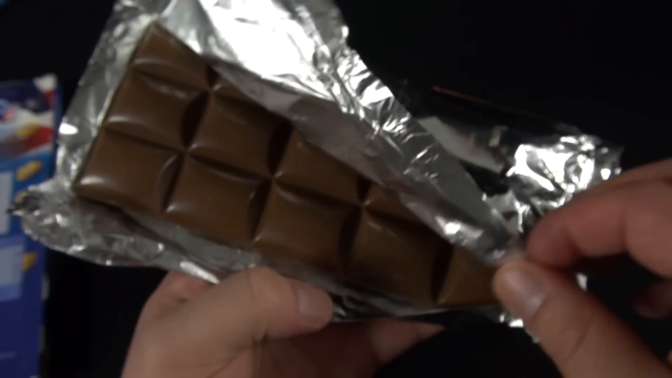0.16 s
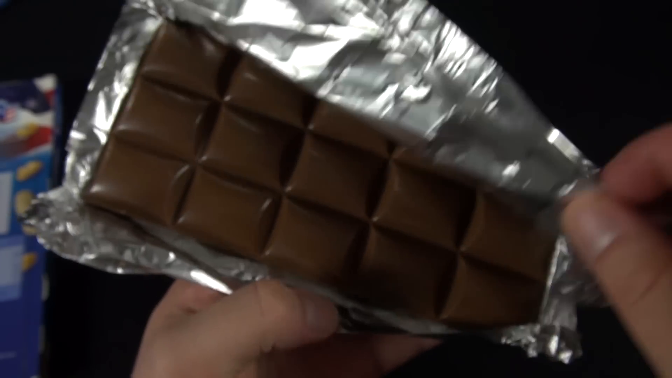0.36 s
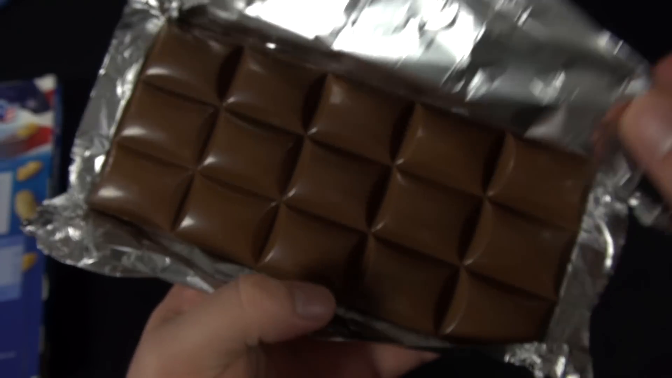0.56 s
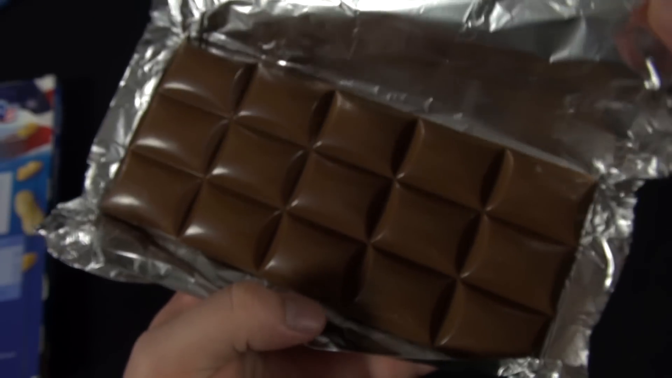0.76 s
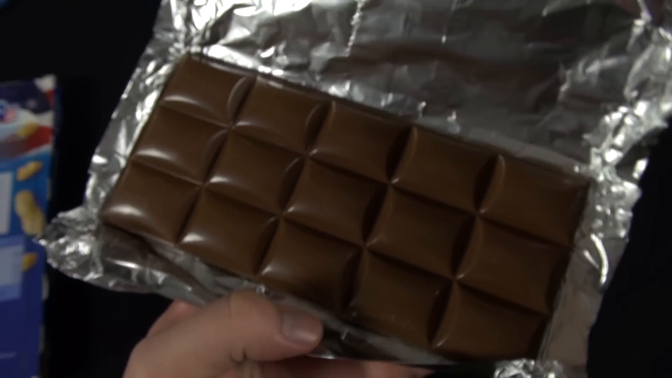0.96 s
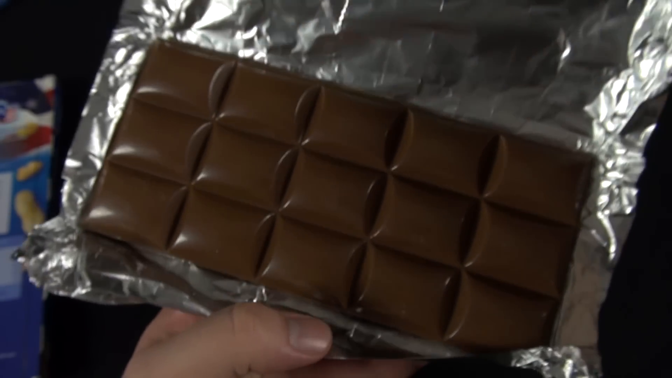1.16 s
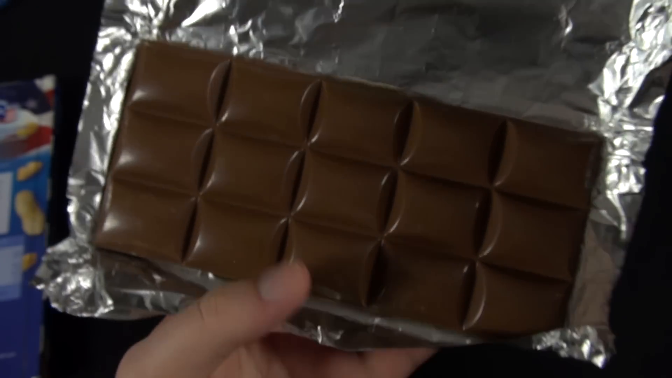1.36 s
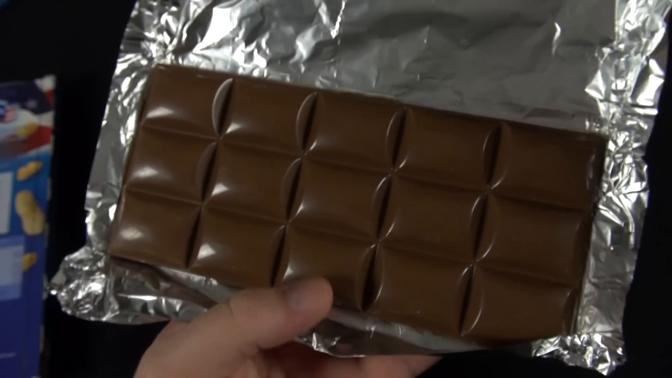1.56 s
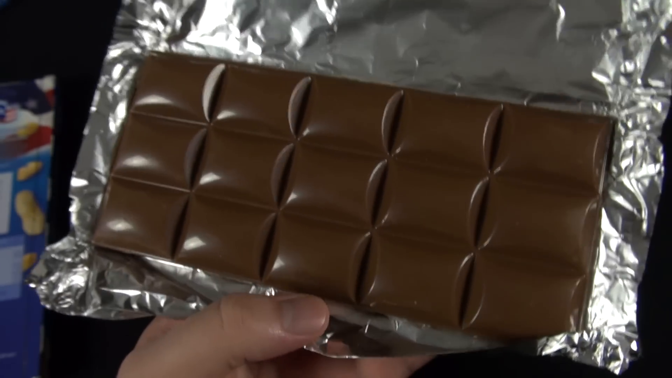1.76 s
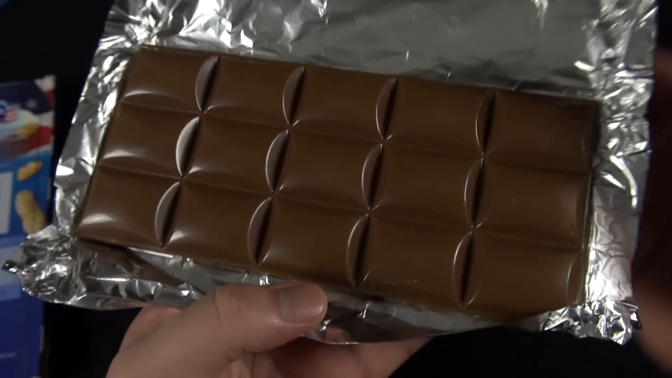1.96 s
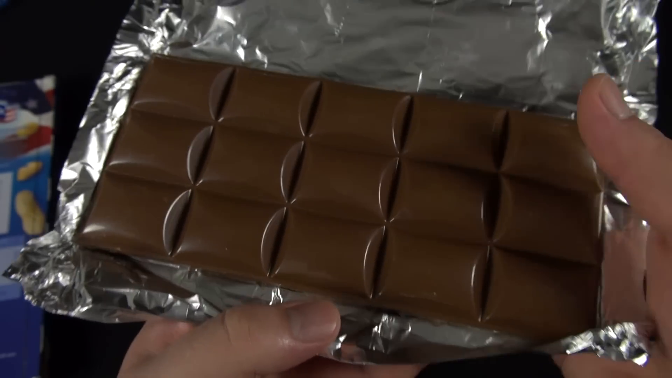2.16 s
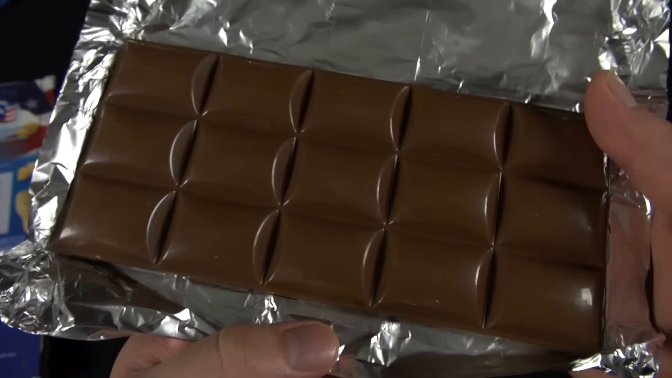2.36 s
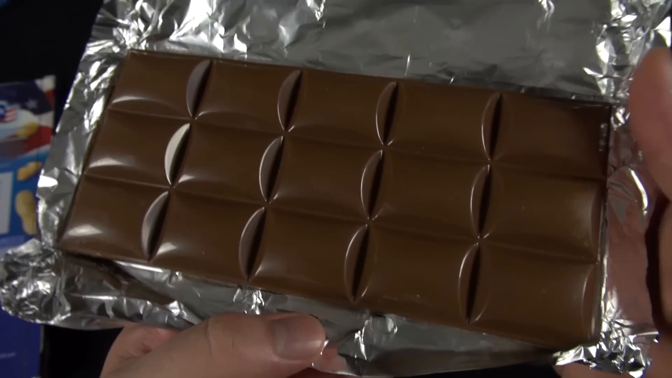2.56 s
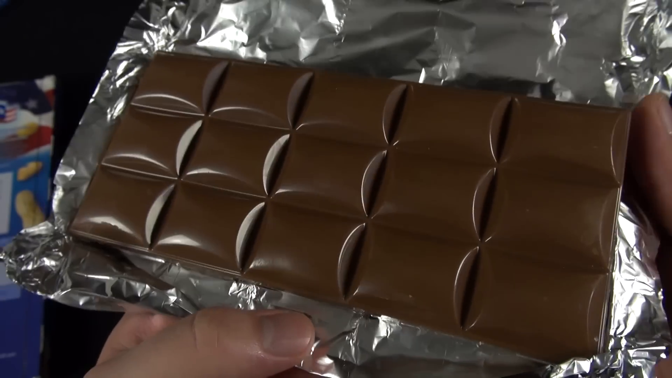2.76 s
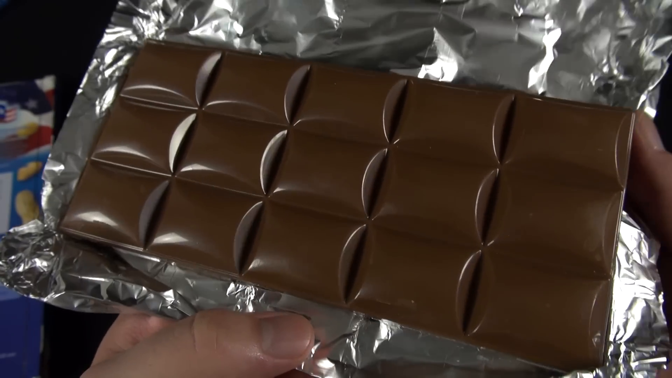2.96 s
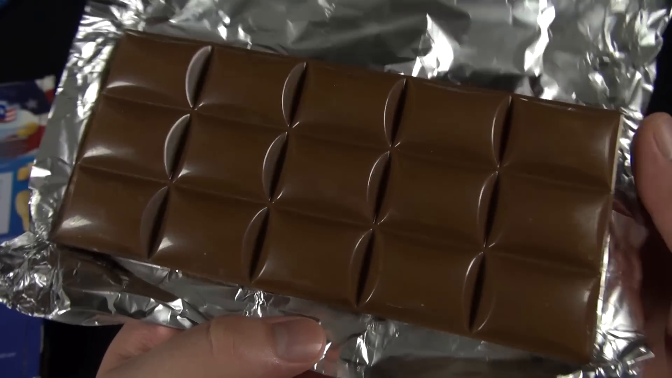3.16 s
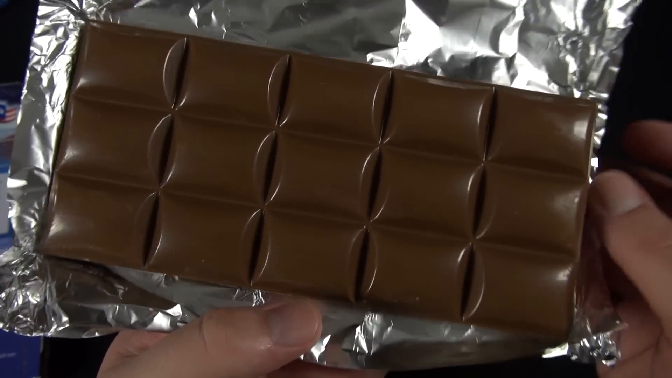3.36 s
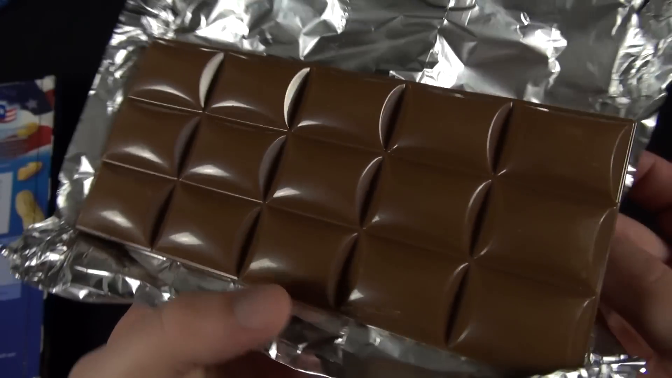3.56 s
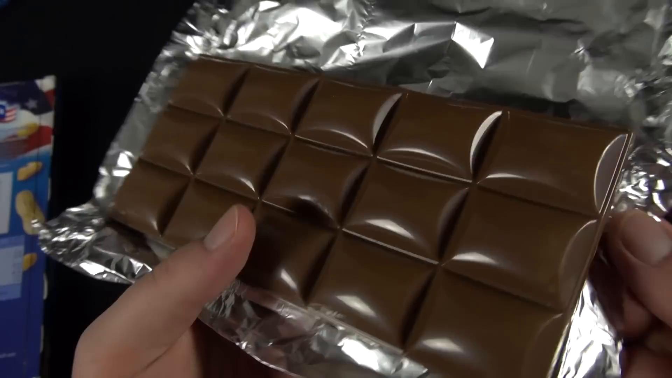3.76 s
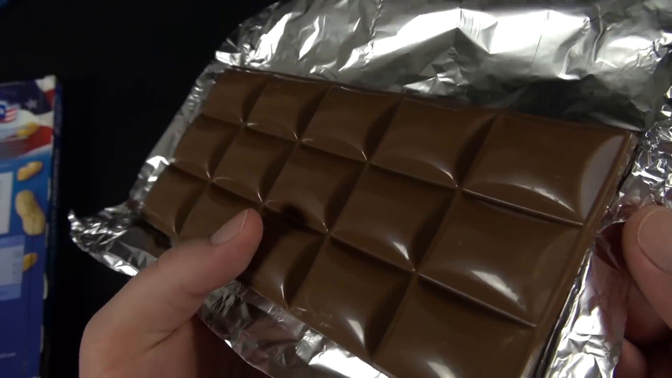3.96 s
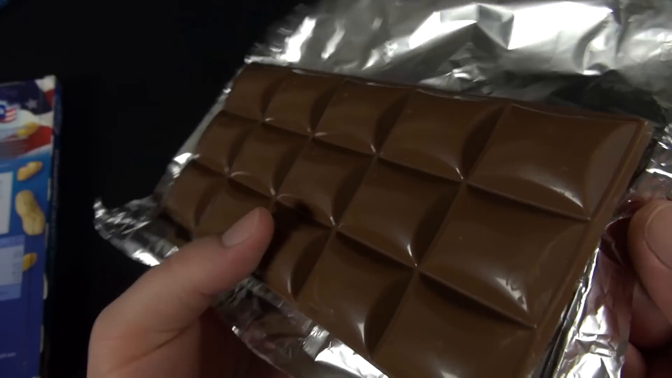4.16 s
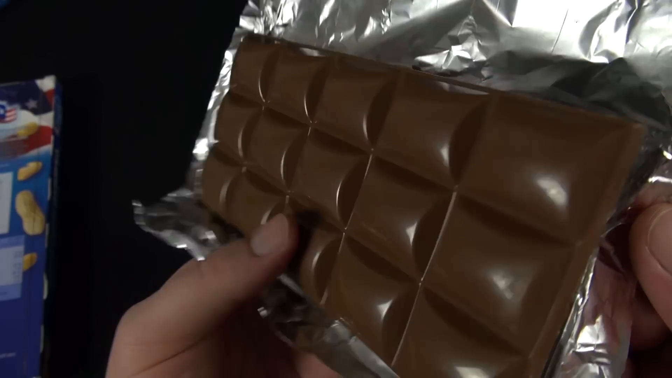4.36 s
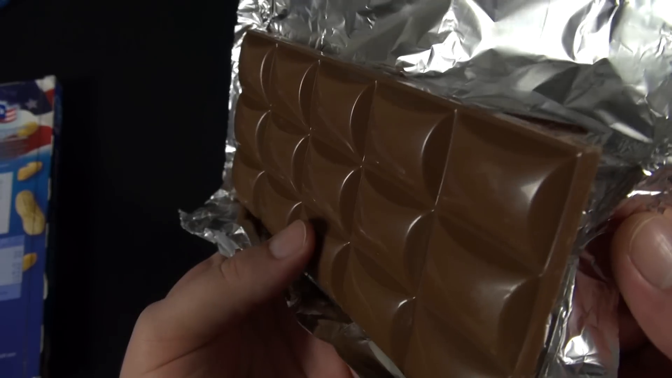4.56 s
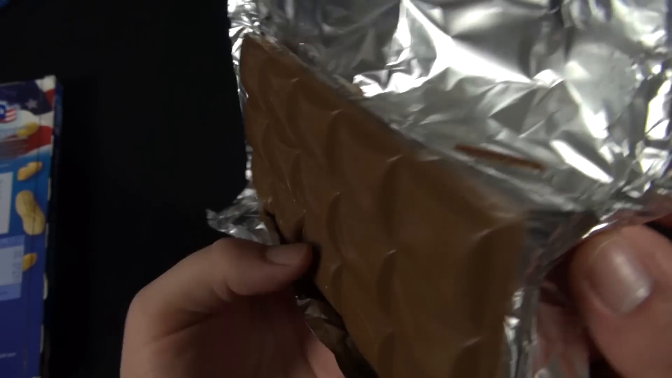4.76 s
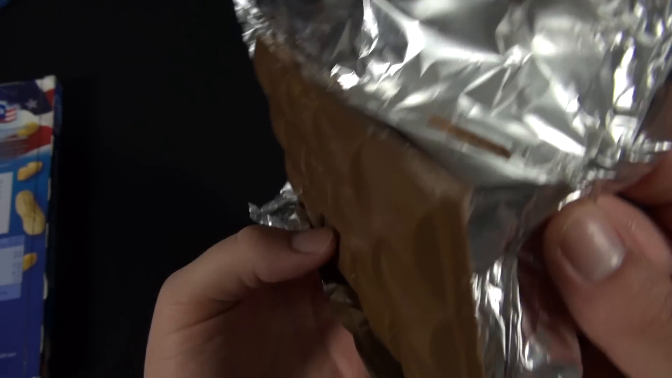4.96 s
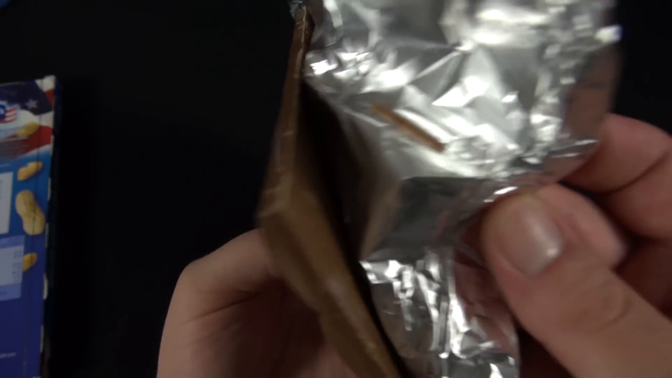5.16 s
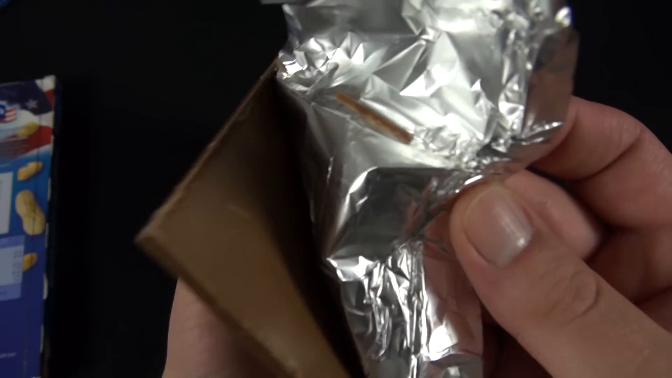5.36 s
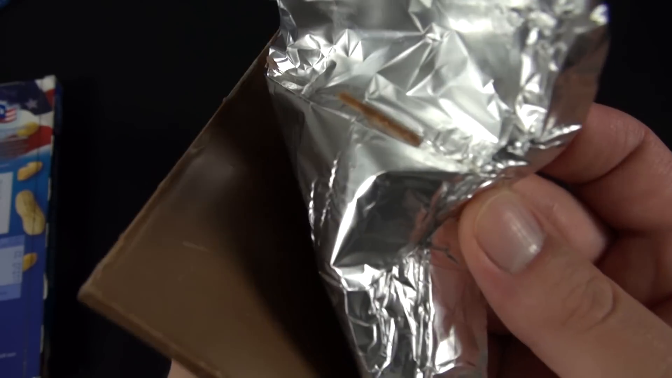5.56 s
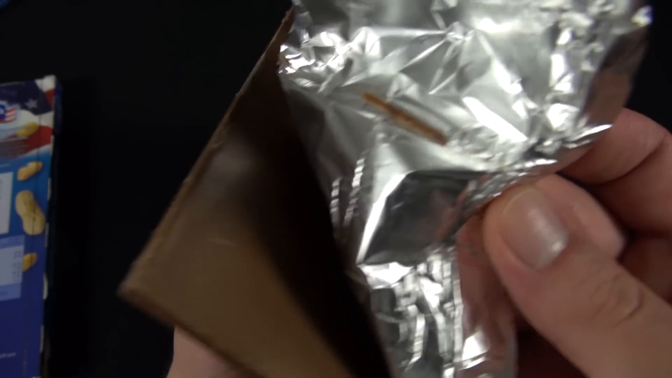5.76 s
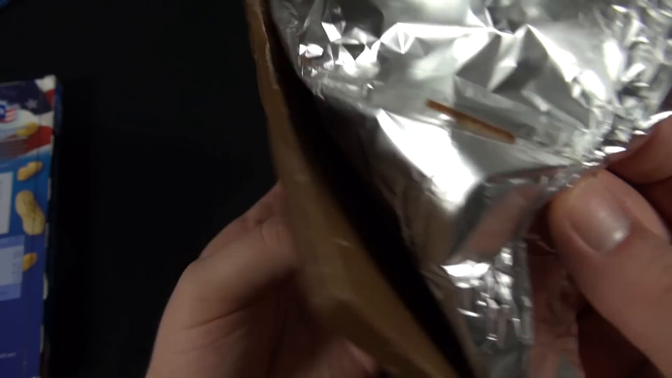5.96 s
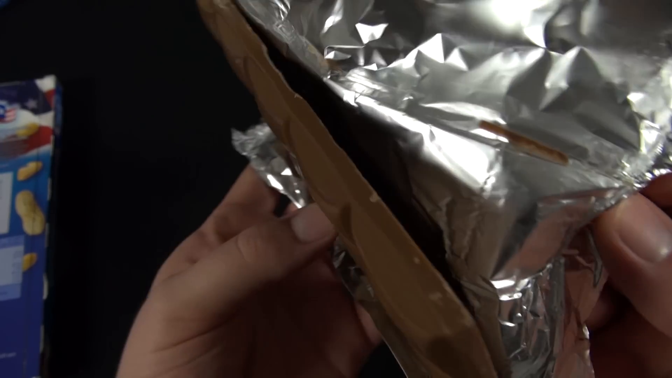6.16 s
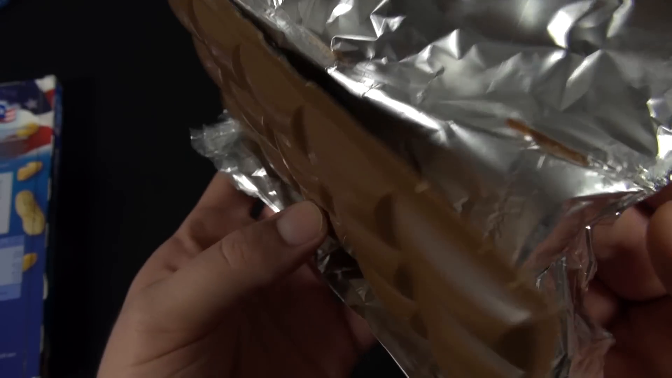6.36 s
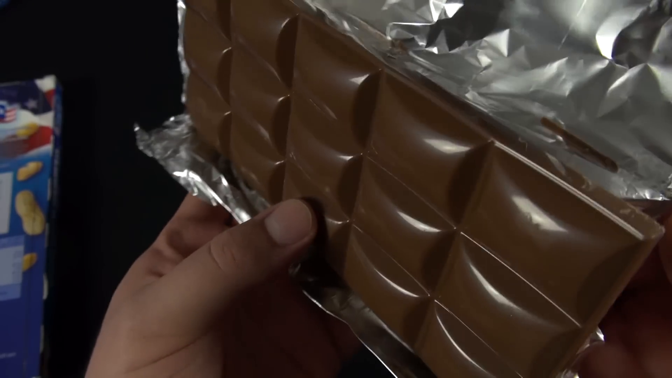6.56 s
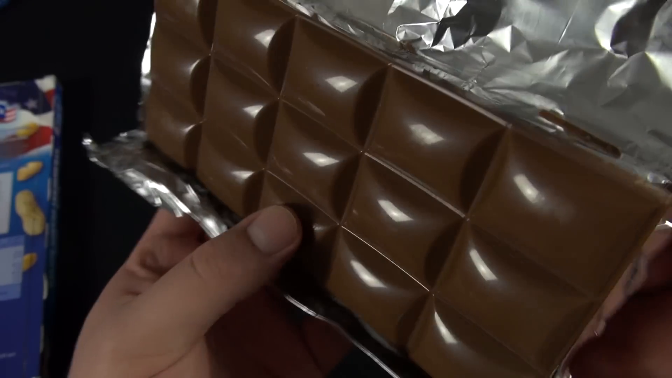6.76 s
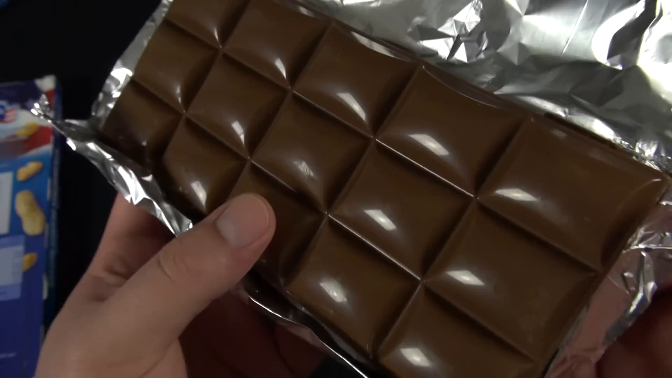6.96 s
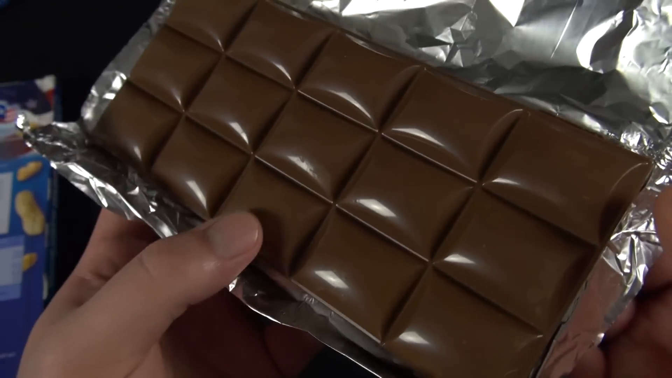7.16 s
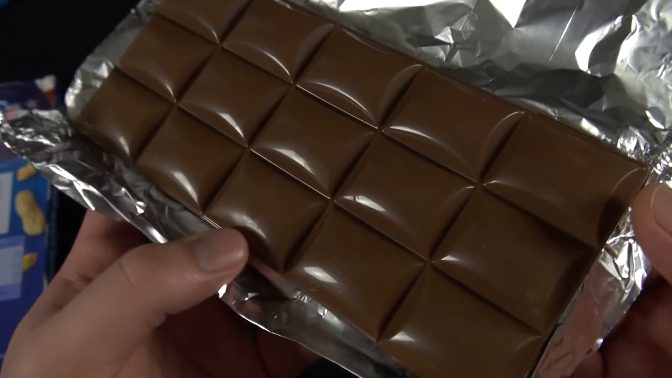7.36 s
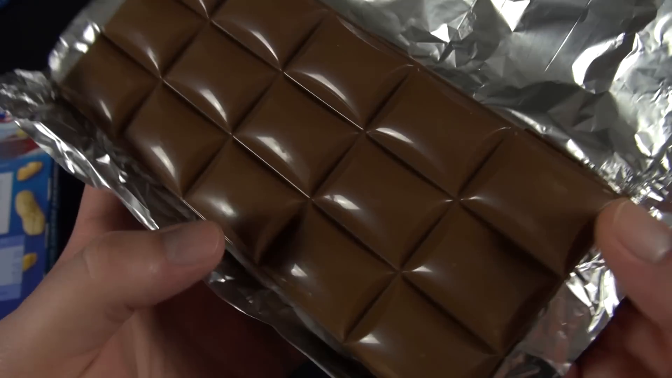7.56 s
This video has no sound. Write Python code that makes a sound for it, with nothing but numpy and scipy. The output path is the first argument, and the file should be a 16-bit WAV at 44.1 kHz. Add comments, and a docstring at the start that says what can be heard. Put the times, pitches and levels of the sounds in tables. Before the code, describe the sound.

Thin foil crinkles and snaps as hands peel it off a chocolate bar, with a few soft, dull knocks.

```python
"""Hands fold thin metal foil back from a chocolate bar, close to a stereo microphone in a quiet room.
From the start, creases buckle and snap, each impulse exciting brief resonances of the foil,
while swarms of smaller creases crackle between them. Around 3 s the foil grows softer; the bar,
as it is turned, knocks dully against the fingers. The folding picks up again, eases near 6 s,
and reaches its loudest snaps and knocks from 6.4 to 7 s before it subsides."""
import sys
import numpy as np
from scipy import signal
from scipy.fft import rfft, irfft, next_fast_len
from scipy.io import wavfile
from scipy.ndimage import uniform_filter1d

SR = 44100
rng = np.random.default_rng(int(sys.argv[2]) if len(sys.argv) > 2 else 0)


def generate_wav(signal):
    """Clip the signal to [-1, 1] and save it as 16-bit WAV at the path in sys.argv[1]."""
    frames = np.transpose(np.atleast_2d(signal))
    scaled = np.clip(frames, -1, 1) * 32767
    pcm = np.round(scaled).astype(np.int16)
    wavfile.write(sys.argv[1], SR, pcm)


N = 334719

# steady working of the hands: t/s, crackle level/dB, share of slack foil (0-1)
HANDLING = [(0, -35, 0.2), (.53, -44, 0.66), (1.2, -49, 0.6), (1.6, -43, 1), (2.2, -45.5, 0.76),
            (2.5, -41, 1), (3.1, -61, 1), (3.4, -47.5, 1), (3.85, -31, 0.6), (4.1, -39.5, 0.8),
            (4.6, -42, 0.47), (4.9, -56, 0.33), (5.5, -37, 0.55), (5.75, -52.5, 0.2), (6.35, -49, 1),
            (6.6, -39.5, 0.36), (6.9, -25, 0.38), (7.15, -61, 0.58), (7.59, -37, 0.34)]


def snaps():
    """Buckling: a crease slips, cracks, then its facet and the hollow under it ring in free decay."""
    # loudest creases: t/s, level/dB, build-up/ms, T60/s, facet f/Hz, hollow f/Hz, low-band gain/dB
    creases = [(0.05, -24.0, 2.3, 0.11, 5870.0, 680.0, -24), (0.08, -20, 0.72, 0.046, 6100, 1070, 1),
               (0.143, -25.0, 8.8, 0.08, 5640, 850, -3), (0.183, -25, 0.5, 0.04, 4960, 850.0, -14),
               (0.217, -20, 2.9, 0.23, 5600.0, 1310.0, -17), (0.264, -18.5, 1.2, 0.3, 4950, 865, -26),
               (0.402, -22.5, 23, 0.16, 5030, 1610, -5), (0.462, -35, 1.8, 0.04, 3070.0, 430, -1),
               (0.476, -41.5, 4, 0.023, 3170, 820, 14), (0.5, -28.5, 8, 0.038, 6620.0, 720.0, 1.5),
               (0.542, -30.5, 0.5, 0.073, 5870, 1160, -11), (0.577, -32, 0.87, 0.27, 5000, 660, -9),
               (0.615, -26.5, 4.3, 0.11, 4780.0, 557, 14), (0.685, -26, 12.7, 0.1, 4900, 1740.0, -26),
               (0.743, -24, 0.7, 0.09, 3220, 790.0, -8), (0.765, -25.5, 0.5, 0.078, 5240, 1470, -27),
               (0.789, -17.5, 0.68, 0.12, 4840, 1600, -2.5), (0.863, -24, 0.3, 0.17, 5400, 1100.0, -3.5),
               (0.878, -22.5, 2.1, 0.14, 2930.0, 1510.0, -16), (0.905, -23, 4.9, 0.055, 6300, 1640.0, -28),
               (0.92, -17.5, 0.6, 0.13, 5230, 910, -2), (0.949, -20.5, 11, 0.087, 4750, 700.0, 1),
               (0.994, -24, 3.6, 0.14, 3860, 945, -5), (1.007, -27, 11, 0.052, 2100.0, 990, 9),
               (1.106, -19.5, 6.2, 0.079, 4320, 703, 1.5), (1.131, -22.5, 3.6, 0.1, 4040, 1110, 1),
               (1.181, -18, 0.5, 0.15, 4900, 1540, 4.5), (1.213, -25.5, 5.6, 0.1, 4900.0, 946, 6),
               (1.258, -25.5, 2.5, 0.062, 6300, 1070.0, 8.5), (1.303, -26, 0.6, 0.1, 4330, 574, -3),
               (1.327, -27, 2.3, 0.16, 3960.0, 795, -1.5), (1.381, -22, 11, 0.096, 5540.0, 1460.0, -8),
               (1.411, -30.5, 18, 0.08, 6650, 850.0, -3.0), (1.45, -28, 0.45, 0.032, 4570, 750.0, -16),
               (1.479, -24, 8.9, 0.11, 2570, 1660, -5), (1.515, -23.5, 11.2, 0.034, 4510.0, 1586, 10),
               (1.594, -27.5, 0.77, 0.06, 7600, 1140, -16), (1.631, -26, 0.7, 0.079, 3540.0, 960, -10),
               (1.659, -24.5, 0.46, 0.15, 5490.0, 1080, -2), (1.705, -22.5, 0.7, 0.24, 4550, 760, 0.5),
               (1.75, -26.5, 3.7, 0.059, 6700.0, 706, 1.0), (1.81, -25.5, 0.46, 0.16, 4700, 374, 9),
               (1.854, -28, 1.2, 0.084, 5940, 920, -5), (1.899, -37, 5.9, 0.048, 5800, 1630.0, -3.0),
               (1.935, -31.5, 0.3, 0.04, 4160.0, 730.0, -5), (1.979, -25.5, 0.4, 0.066, 7300, 1000.0, -17),
               (2.002, -28.0, 0.79, 0.036, 3760, 930.0, -21), (2.036, -27, 0.68, 0.04, 2260.0, 740, -2),
               (2.045, -27, 0.78, 0.083, 3750.0, 1530, -3), (2.058, -25.5, 0.62, 0.04, 3600, 754, 2),
               (2.074, -30, 0.6, 0.061, 4790.0, 690, -3.0), (2.101, -23.0, 0.61, 0.076, 3200, 696, -4),
               (2.196, -26, 2, 0.085, 6500, 1830, -2), (2.224, -29.5, 0.5, 0.05, 3040, 1260, -22),
               (2.273, -31.5, 15.0, 0.052, 3130, 674, -6.5), (2.332, -32, 1.1, 0.14, 4470, 1810, 1),
               (2.367, -23, 0.37, 0.071, 4240, 713, 4), (2.411, -30, 0.65, 0.1, 4650, 710.0, 7),
               (2.477, -41, 5.4, 0.055, 2580.0, 610.0, -3.0),
               (2.495, -32.5, 0.7, 0.033, 4920.0, 400.0, -12), (2.538, -35, 0.3, 0.078, 3010.0, 690, 9),
               (2.567, -24.5, 0.74, 0.1, 2160.0, 707, 8.5), (2.678, -28.0, 0.3, 0.049, 6560, 720.0, -14),
               (2.711, -27.5, 14.2, 0.34, 6510.0, 1770, -4.0), (2.77, -25, 18, 0.1, 1900, 784, 0),
               (2.874, -34.5, 6, 0.071, 4400, 680, 7), (2.939, -30, 7.9, 0.11, 3580, 684, -6.5),
               (2.996, -39, 2.5, 0.16, 4210, 1550, 8), (3.016, -31.5, 2.4, 0.15, 8100, 900, -7),
               (3.057, -38, 2.3, 0.079, 4630, 1720, -13), (3.109, -32, 3.3, 0.092, 4000, 680.0, -2),
               (3.132, -29.5, 0.54, 0.035, 1780, 1640.0, 16), (3.156, -27.5, 0.43, 0.031, 1960.0, 715, 10),
               (3.243, -34.0, 4.6, 0.087, 4860, 1670.0, -2), (3.273, -34, 7.7, 0.082, 4020, 1680, -42),
               (3.354, -38.5, 16, 0.067, 5260, 720.0, 2), (3.423, -36.5, 0.95, 0.45, 6270, 1680, 2.0),
               (3.485, -25, 7.6, 0.06, 5450, 860.0, -7), (3.521, -25.5, 1.1, 0.08, 4680.0, 1550, 12),
               (3.577, -27, 0.73, 0.16, 4740.0, 650.0, -10), (3.603, -26.0, 10, 0.065, 4720.0, 720, 3.5),
               (3.672, -29, 0.5, 0.051, 6560, 1700, -24), (3.711, -34, 0.5, 0.051, 4480, 716, -24),
               (3.784, -23, 4.6, 0.032, 3900, 1097, 1), (3.863, -27.5, 18, 0.18, 4570.0, 717, -1),
               (3.921, -21.5, 0.38, 0.081, 5140, 1620, -1), (4.021, -37.5, 3.4, 0.032, 5420.0, 676, 25),
               (4.043, -30, 1.1, 0.07, 7000, 1320.0, -13), (4.069, -30.5, 2.6, 0.05, 2260, 1230, 3),
               (4.115, -28, 4.2, 0.28, 4670, 1590, -4.0), (4.145, -25, 19, 0.085, 2900, 1560, -2.0),
               (4.219, -20, 5.4, 0.24, 7000, 1610, -11), (4.358, -31, 0.8, 0.074, 4970, 417, -1),
               (4.386, -30.0, 0.69, 0.05, 3100, 1230, 5), (4.421, -23.0, 0.75, 0.2, 4170, 1600, 0),
               (4.437, -24, 10, 0.14, 2820, 1290, 4), (4.467, -24.5, 7, 0.3, 4300, 885, 1),
               (4.554, -27, 17, 0.15, 6800, 660.0, -16), (4.628, -26, 0.5, 0.2, 4600, 1340, -9.0),
               (4.657, -19.5, 0.25, 0.054, 6300, 1340, -4), (4.693, -23, 0.82, 0.16, 4340, 1230, -2.5),
               (4.744, -20.5, 0.5, 0.057, 6060, 1105, 4.0), (4.755, -25.5, 3.9, 0.053, 4000, 1270, 4),
               (4.793, -22, 0.54, 0.033, 4810.0, 1780, -48), (4.851, -31.5, 5.2, 0.04, 2780, 475, 9),
               (4.864, -26.5, 0.7, 0.1, 6700, 1670, -36), (4.886, -25, 0.55, 0.097, 5900, 1690, -30),
               (4.912, -26.0, 8.1, 0.045, 5340, 1120, -19), (4.928, -23, 3.6, 0.086, 2600, 1110, -8),
               (4.982, -21.5, 0.65, 0.11, 2900, 940.0, -32), (5.043, -22, 2.3, 0.069, 3350, 1320, 11.5),
               (5.126, -35, 5.9, 0.039, 3890.0, 466, 20), (5.147, -21.5, 1.1, 0.081, 3900, 1720, -25),
               (5.173, -23.5, 1.4, 0.074, 6800, 1500.0, -15), (5.201, -27, 0.5, 0.07, 2370.0, 1290.0, -7),
               (5.228, -27, 2, 0.088, 4730, 1276, -23), (5.243, -20.0, 0.43, 0.061, 5940, 1110, -1.5),
               (5.303, -30.5, 2.7, 0.25, 3840, 1370, -3), (5.333, -27.5, 0.76, 0.033, 4800.0, 630, -0.5),
               (5.364, -31.5, 11, 0.069, 7120.0, 980, 4), (5.382, -26, 0.6, 0.068, 4070, 1570, -16),
               (5.397, -28.5, 0.8, 0.062, 4600, 1580, 3), (5.442, -27, 1.8, 0.049, 3340, 1670, -1),
               (5.467, -24, 0.5, 0.04, 2830, 815, 3), (5.477, -38, 0.64, 0.11, 6100, 1570.0, -5.0),
               (5.491, -25.5, 0.8, 0.055, 6280.0, 1670.0, -20), (5.522, -32.5, 4, 0.061, 5090.0, 790.0, 0),
               (5.596, -22.0, 3.5, 0.12, 4930, 1230, -23), (5.67, -33.5, 0.59, 0.05, 6300, 1410.0, -25),
               (5.693, -39.5, 0.27, 0.054, 5890.0, 1540.0, -8), (5.752, -33, 1.1, 0.068, 6070.0, 757, 7),
               (5.782, -32, 0.75, 0.081, 4530, 1250, -5.0), (5.843, -32, 0.7, 0.13, 6570, 1700, -36),
               (5.895, -23.5, 0.3, 0.081, 5040, 1140, 0), (5.937, -25.5, 0.34, 0.12, 6000, 1420, 0.5),
               (5.975, -30, 10.7, 0.076, 2730.0, 807, 12.5), (6.043, -23, 2.3, 0.075, 4760.0, 1090, -8),
               (6.135, -31.5, 0.78, 0.15, 4200, 370.0, -12.0), (6.228, -29, 0.44, 0.08, 3820.0, 666, 2.5),
               (6.243, -27.5, 0.9, 0.14, 4600, 1720.0, -36), (6.309, -27.5, 0.3, 0.065, 4850, 1290.0, -1),
               (6.33, -26, 0.34, 0.19, 3740, 1400, 1), (6.384, -26, 10, 0.094, 3800, 1780, 1.5),
               (6.448, -22, 5.1, 0.28, 4740, 375, 6), (6.519, -17.5, 0.58, 0.078, 3630, 1260, 11),
               (6.544, -17.5, 0.5, 0.088, 2820, 690, 0), (6.555, -19.5, 0.96, 0.15, 4060, 1710.0, 11),
               (6.597, -15.5, 0.39, 0.27, 4250.0, 1320, 9.5), (6.648, -18, 3.3, 0.096, 6900, 1150, -12),
               (6.753, -23.0, 2.3, 0.32, 6100, 1610.0, -13), (6.841, -21.0, 9.2, 0.043, 5260.0, 1400, 3.5),
               (6.864, -18.5, 0.81, 0.14, 4620.0, 743, 6), (6.912, -21.5, 8.7, 0.052, 4320, 590, -7),
               (6.946, -18, 0.3, 0.13, 4070, 1580, -4), (6.999, -20.5, 23, 0.095, 4720, 1340.0, 0),
               (7.088, -26.5, 0.95, 0.07, 6000, 430.0, 5.5), (7.111, -31, 2.6, 0.19, 4800, 1360, 4.5),
               (7.18, -27, 1.6, 0.045, 4700, 1740, -24), (7.254, -30.5, 0.3, 0.035, 2460, 1750, -16),
               (7.285, -28.5, 0.5, 0.032, 6360, 1080.0, -4.0), (7.311, -26, 3.6, 0.1, 4420, 1590, -12),
               (7.401, -29, 0.34, 0.13, 2630.0, 690, 0), (7.476, -30.5, 3.6, 0.047, 4460, 850, -2),
               (7.516, -28, 0.7, 0.076, 5830, 1650, 3), (7.533, -29, 1.6, 0.073, 6410.0, 854, 4),
               (7.553, -26, 0.45, 0.089, 3970.0, 1450.0, -8.0)]
    # tightness of the fold, which brightens the snaps: t/s, treble gain/dB
    tightness = [(0, 0.5), (1.5, 1), (2.5, -1), (3.5, 1), (4.3, 2.5), (5.2, 4.5), (5.8, 0), (6.6, 1),
                 (7.59, -1)]
    length, onset = 4096, 1024  # samples
    crack_t60, ping_t60, pop_t60 = .006, .022, .038  # s
    times, db, build_ms, t60, facet_hz, hollow_hz, body_db = np.transpose(creases)[..., None]
    edge_db = np.interp(times, *np.transpose(tightness)) + 2.5 * rng.standard_normal(times.shape)
    edge_db += 4 * np.log2(facet_hz / 4000)  # smaller facets are brighter
    t = (np.arange(length) - onset) / SR
    build_ms = np.clip(build_ms, .2, 15)
    sudden = np.clip(1 - build_ms / 3.5, 0, 1)  # only a quick give makes a sharp crack
    decay = sudden * amp(8 - 60 * abs(t) / crack_t60) + amp(-60 * abs(t) / np.maximum(t60, .015))
    lead = abs(1000 * t) / build_ms
    growth = amp(-8 * lead) * np.clip(10 * (1.3 - lead), 0, 1)  # slips set in abruptly, then grow
    envelope = np.where(t < 0, growth, decay) * signal.windows.tukey(length, .2)
    noise, slips = rng.standard_normal((len(times), length, 2)).T.swapaxes(1, 2)
    ping = (.2 + sudden) * amp(-5 - 60 * abs(t) / ping_t60) * np.sin(2 * np.pi * facet_hz * t)
    pop = amp(-19.5 - 60 * abs(t) / pop_t60) * np.sin(2 * np.pi * hollow_hz * t)
    burst = envelope * noise * amp(2 * slips) + (t > 0) * (ping + pop)
    neighbours_hz = np.exp(rng.uniform(np.log(1500), np.log(13000), (len(times), 4))).T[..., None]

    def response(hz):
        """Filters in series multiply: the sheet, the local resonances and a bass roll-off."""
        facet = resonance(hz, facet_hz, db=1.67, sharpness=18)
        hollow = resonance(hz, hollow_hz, db=7.5 + .1 * body_db, sharpness=22)
        neighbours = np.prod([resonance(hz, f, db=.43, sharpness=48) for f in neighbours_hz], axis=0)
        low_cut = hz / np.hypot(hz, .2 * hollow_hz)
        return sheet(hz, body_db, edge_db) * facet * hollow * neighbours * low_cut

    sounds = coloured(burst, response)
    attack = sounds[:, onset:onset + round(.004 * SR)]
    sounds *= amp(db) / np.sqrt(np.mean(attack ** 2, axis=1, keepdims=True))
    out = np.zeros(N + onset)
    for start, sound in zip(times[:, 0], sounds):
        add(out, start, sound)
    return out[onset:]


def crackle(per_s=1500, spread_db=3.5, facets=16):
    """Shot noise: small creases give way at random, each ringing a facet of its own size."""
    strength = amp(spread_db * np.minimum(rng.exponential(1, N), 4))
    impulses = strength * (rng.random(N) < per_s / SR)
    which = rng.integers(0, facets, N)
    out, t = np.zeros(N), np.arange(1024) / SR
    envelope = amp(-60 * t / .00063) + amp(-7.5 - 60 * t / .019)  # click and tail
    for k, facet_hz in enumerate(np.geomspace(500, 12000, facets)):
        burst = rng.standard_normal(len(t)) * envelope
        grain = coloured(burst, lambda hz: resonance(hz, facet_hz, db=5.1, sharpness=4.9))
        out += signal.oaconvolve(impulses * (which == k), unit_rms(grain))[:N]
    times, _, shares = np.transpose(HANDLING)
    share = np.interp(np.arange(N) / SR, times, shares)
    slack = coloured(out, lambda hz: sheet(hz, body_db=1.76))
    taut = coloured(out, lambda hz: sheet(hz, body_db=-10))
    out = share * slack + (1 - share) * taut
    out /= np.sqrt(uniform_filter1d(out ** 2, size=SR // 25) + 1e-20)  # the hands alone set the level
    return effort() * out


def effort(fade_db=22, swell_share=.85, pause_s=.042, resume_s=.0046):
    """Incoherent sources add in power: handling and swarms set the crackle's level; pauses hush it."""
    # swarms of small creases as a fold gives way: peak t/s, level/dB, time to fall by fade_db/s
    swarms = [(0.0, -24, 0.094), (.6, -35, 0.07), (.648, -33, .05), (0.091, -24.5, 0.05), (.278, -25, 0.34),
              (.31, -26, 0.28), (0.403, -20, 0.083), (.687, -29, 0.22), (.875, -38, 0.045),
              (.936, -29, 0.086), (1.02, -27, 0.085), (1.145, -27, 0.34), (1.312, -33, 0.033),
              (1.384, -27, .1), (1.515, -28.5, 0.15), (1.761, -26, 0.082), (1.888, -32, 0.053),
              (2.052, -38.5, 0.05), (2.265, -39.5, .05), (2.581, -28.5, 0.043), (2.715, -28, 0.089),
              (2.789, -27.5, 0.11), (2.949, -34.5, 0.047), (3.167, -36.5, 0.26), (3.533, -24, 0.083),
              (3.792, -31.5, 0.054), (3.948, -29, 0.055), (4.04, -35, 0.033), (4.124, -28, 0.12),
              (4.233, -22, 0.1), (4.437, -35, 0.29), (4.55, -23, 0.053), (4.643, -33.5, 0.071),
              (4.809, -30, 0.16), (5.055, -31.5, 0.63), (5.361, -26.5, 0.017), (5.881, -38, 0.054),
              (6.049, -31.5, 0.063), (6.15, -38.5, 0.051), (6.247, -33, 0.041), (6.463, -30.5, 0.075),
              (6.59, -28.5, 0.15), (6.696, -25, 0.036), (6.78, -41, 0.035), (6.996, -22.5, 0.086),
              (7.319, -31.5, 0.23)]
    # momentary stops of the hands: end t/s, depth/dB
    pauses = [(.07, 7), (.135, 4), (.21, 4.5), (.54, 3), (.575, 4), (.86, 0), (1.1, 1), (1.3, 6.5),
              (1.592, 12), (1.977, 11), (2.17, 1), (2.527, 10), (2.932, 4), (3.105, 12), (3.708, 15),
              (4.02, 15), (4.625, 5), (5.3, 10), (5.84, 5), (6.03, 10), (6.226, 9), (6.442, 14),
              (7.177, 11), (7.28, 13)]
    t = np.arange(0, N / SR + .002, .002)
    peak, db, dying_s = np.transpose(swarms)[..., None]
    from_peak = np.maximum((t - peak) / dying_s, (peak - t) / (swell_share * dying_s))
    steady = amp(np.interp(t, *np.transpose(HANDLING)[:2]))
    power = steady ** 2 + (amp(db - fade_db * from_peak) ** 2).sum(0)
    end, depth_db = np.transpose(pauses)[..., None]
    hush = np.clip(1 - np.maximum((end - t) / pause_s, (t - end) / resume_s), 0, 1)
    return np.interp(np.arange(N) / SR, t, np.sqrt(power) * amp(-(depth_db * hush).sum(0)))


def sheet(hz, body_db=0, edge_db=0):
    """Frequency scales inversely with size: big slack areas of foil add lows, tight folds add highs."""
    # spectrum of the sheet: f/Hz, level/dB
    foil_spectrum = [(88, -21), (150, -15), (221, -7.5), (501, -6), (697, -3), (990, -5), (1110, -4),
                     (3180, -2.5), (4880, -1), (7200, -2), (9830, -13.5), (11500, -12.5), (15700, -33.5)]
    # mode of the foil lying on the bar: f/Hz, bandwidth/Hz, level/dB
    contact_mode = [(730, 15, -15.5)]
    low = 1 / (1 + (hz / 1400) ** 4)
    high = 1 / (1 + (8500 / (hz + 1)) ** 6)
    mode = sum(amp(db) / np.sqrt(1 + (2 * (hz - f) / width) ** 2) for f, width, db in contact_mode)
    return amp(level_at(foil_spectrum, hz) + body_db * low + edge_db * high) * (1 + mode)


def knocks(cycles_per_t60=14.6, thud_hz=72, thud_t60_s=.43):
    """Damped oscillation: a soft blow sets the bar swinging over a slower, deeper thud of the hand."""
    # the bar bumping the fingers: t/s, swing level/dB, f/Hz, thud level/dB
    blows = [(.612, -30.5, 213, -64), (.926, -39.5, 91.5, -44), (1.257, -41, 107, -56),
             (1.505, -27, 259, -45), (1.746, -40, 240, -47), (1.817, -32, 360, -47),
             (2.566, -29, 258, -45.5), (2.82, -37, 143, -65), (2.936, -44, 260, -50),
             (3.482, -39.5, 132, -62), (3.541, -34.5, 168, -53), (3.77, -42, 121, -56),
             (4.021, -34, 245, -70), (4.089, -32, 233, -57), (4.147, -37, 151, -65), (4.219, -33, 198, -57),
             (4.238, -37, 111, -50), (4.85, -37, 408, -75), (5.124, -41, 420, -75), (5.971, -36, 127, -50),
             (6.443, -21.5, 222, -46), (6.517, -33, 296, -57), (6.554, -35, 262, -44),
             (6.597, -29, 300, -53), (6.832, -24.5, 305, -60), (6.882, -27, 104, -49),
             (6.975, -32, 141, -48)]
    out, t = np.zeros(N), np.arange(SR // 5) / SR
    for start, db, hz, thud_db in blows:
        swing = amp(db - 60 * t * hz / cycles_per_t60) * (1 - np.exp(-t / .00067))
        thud = amp(thud_db - 60 * t / thud_t60_s) * (1 - np.exp(-t / .0037))
        add(out, start, swing * np.sin(2 * np.pi * hz * t) + thud * np.sin(2 * np.pi * thud_hz * t))
    return out


def room(level_db=-54):
    """Stationary noise: the faint background of the room, weak in the treble."""
    # spectrum of the background: f/Hz, relative level/dB
    room_spectrum = [(20, -2.5), (45, -14), (70, -21), (100, -6.5), (220, -13), (500, -14.5), (2000, -12.5),
                     (7000, -45), (15000, -66)]
    noise = coloured(rng.standard_normal(N), lambda hz: amp(level_at(room_spectrum, hz)))
    return amp(level_db) * unit_rms(noise)


def resonance(hz, centre_hz, db, sharpness):
    """A Lorentzian peak of height db, added to a flat response."""
    return 1 + amp(db) / (1 + (sharpness * np.log((hz + 1) / centre_hz)) ** 2)


def coloured(x, gain):
    """Minimum-phase filtering: folding the cepstrum makes the response gain(hz) causal."""
    size = next_fast_len(x.shape[-1])
    log_gain = np.log(gain(np.fft.rfftfreq(size, 1 / SR)) + 1e-5)
    cepstrum = irfft(log_gain, size)
    cepstrum[..., 1:size // 2] *= 2
    cepstrum[..., size // 2 + 1:] = 0
    return irfft(rfft(x, size) * np.exp(rfft(cepstrum)), size)[..., :x.shape[-1]]


def level_at(spectrum, hz):
    """Level interpolated on a logarithmic frequency axis."""
    f, db = np.transpose(spectrum)
    return np.interp(np.log(hz + 1), np.log(f + 1), db)


def amp(db):
    """Amplitude ratio of a level in decibels."""
    return 10 ** (np.asarray(db) / 20)


def unit_rms(x):
    """Normalisation to unit mean power."""
    return x / np.sqrt(np.mean(x ** 2) + 1e-20)


def add(mix, start_s, sound):
    """Superposition of a delayed sound on the mix."""
    part = mix[round(start_s * SR):][:len(sound)]
    part += sound[:len(part)]


def scene():
    """Linear superposition of foil, bar and room, slightly louder on the right."""
    background = room()
    return (snaps() + crackle() + knocks() + background) * amp([[-.4], [.4]])


def record(dry, bounce_t60_s=.032, cutoff_hz=15840):
    """Mid-side stereo: a sideways capsule hears near reflections whose phase drifts as the hands move."""
    # response of the sideways capsule: f/Hz, relative level/dB
    side_response = [(60, -49), (110, -48), (200, -24), (380, -13), (700, -17.5), (1290, -10), (2380, -8),
                     (4400, -12.5), (8120, -7), (15000, -9)]
    t = np.arange(600) / SR
    bounce = rng.choice([-1., 1.], len(t)) * amp(-60 * t / bounce_t60_s)
    side = signal.oaconvolve(dry.mean(0), bounce / np.linalg.norm(bounce))[:N]
    side = coloured(side, lambda hz: amp(level_at(side_response, hz) - 1))
    drift = .006 * np.cumsum(np.repeat(rng.standard_normal(N // 64 + 1), 64)[:N])  # random walk, rad
    side = (signal.hilbert(side, next_fast_len(N))[:N] * np.exp(1j * drift)).real
    stereo = dry + side * [[1], [-1]]
    low_pass = signal.firwin(511, cutoff_hz, window=("kaiser", 9), fs=SR)
    return signal.oaconvolve(stereo, low_pass[None], "same")


dry = scene()
out = record(dry)
generate_wav(out)
```